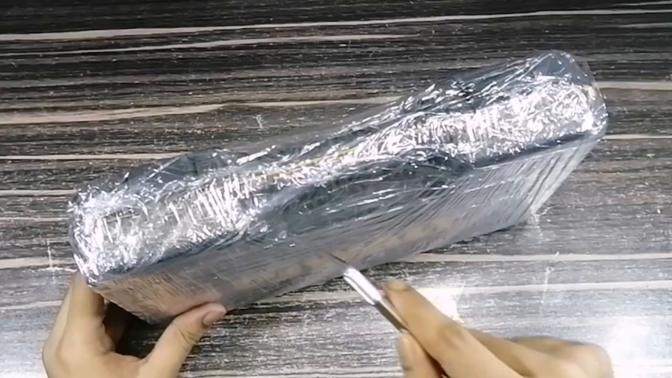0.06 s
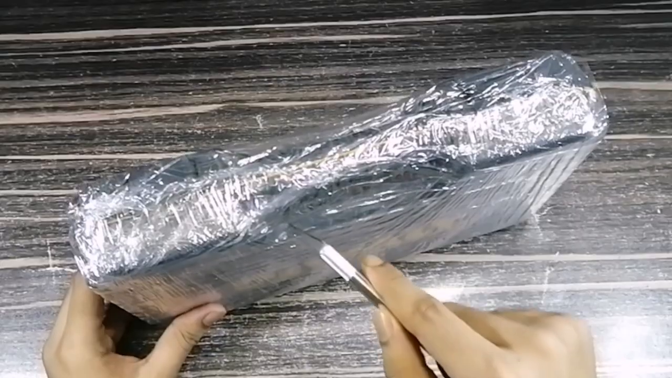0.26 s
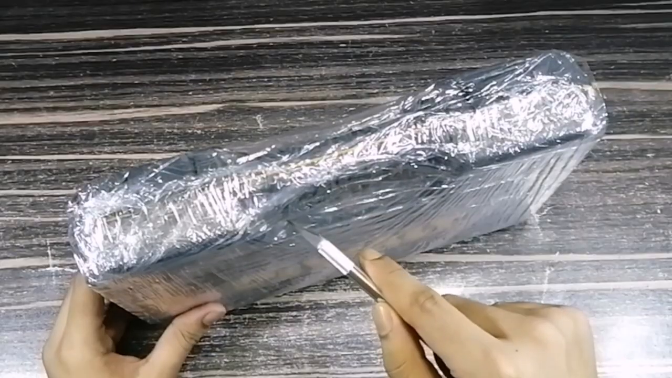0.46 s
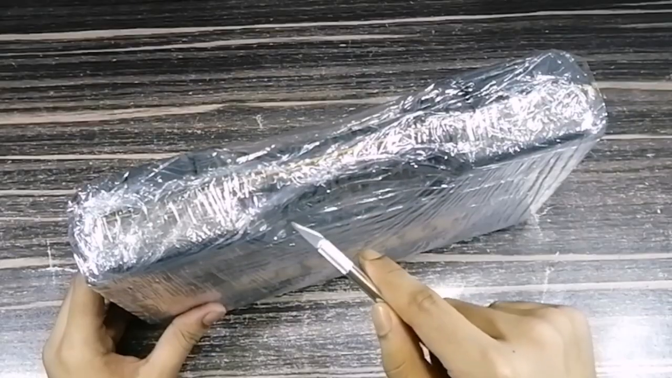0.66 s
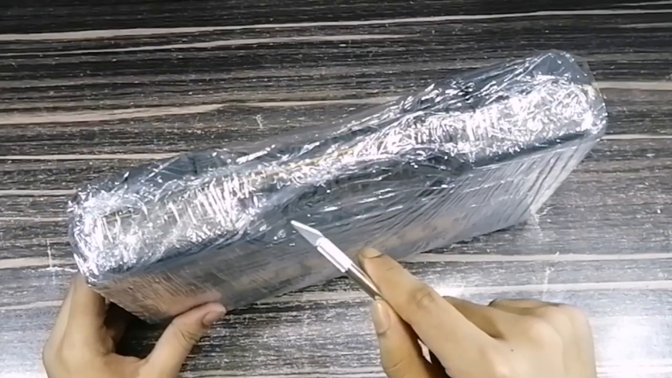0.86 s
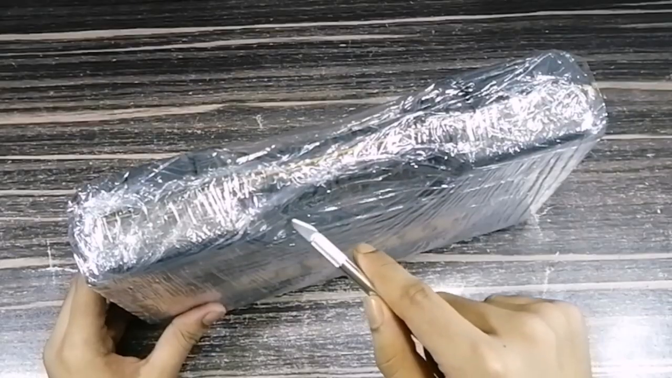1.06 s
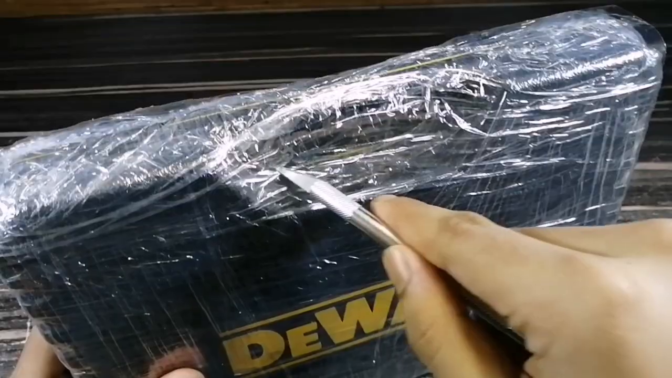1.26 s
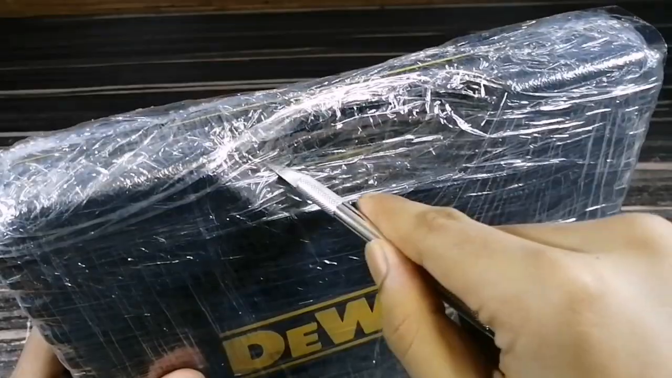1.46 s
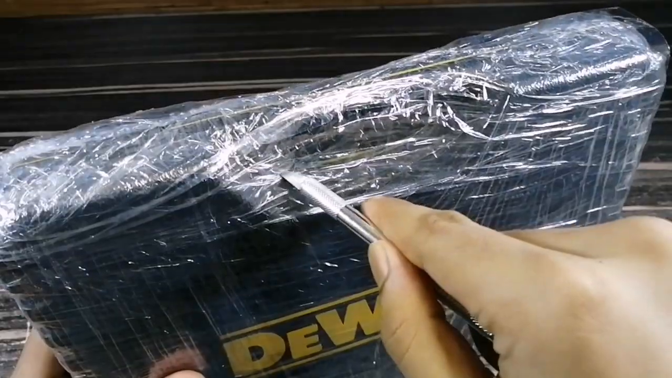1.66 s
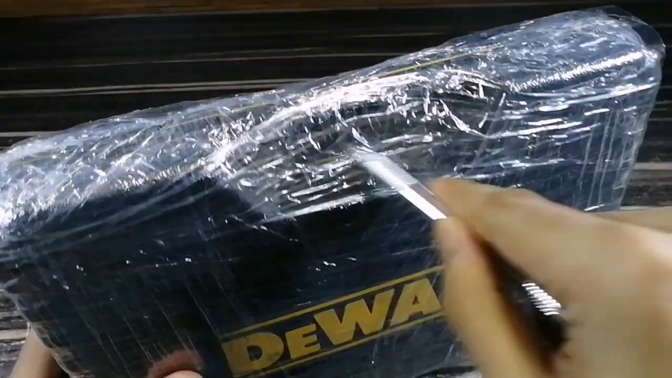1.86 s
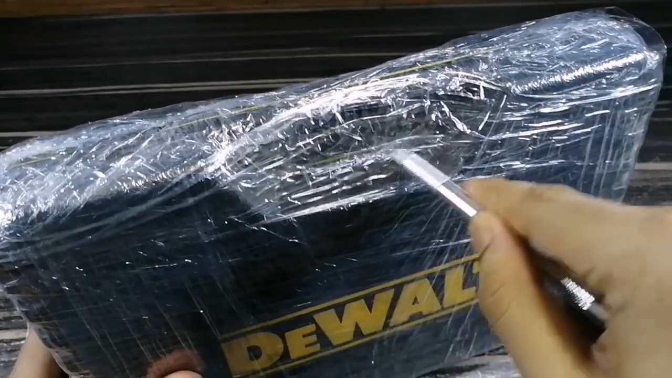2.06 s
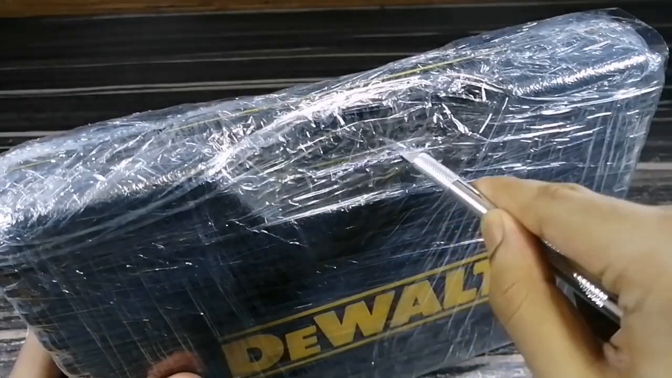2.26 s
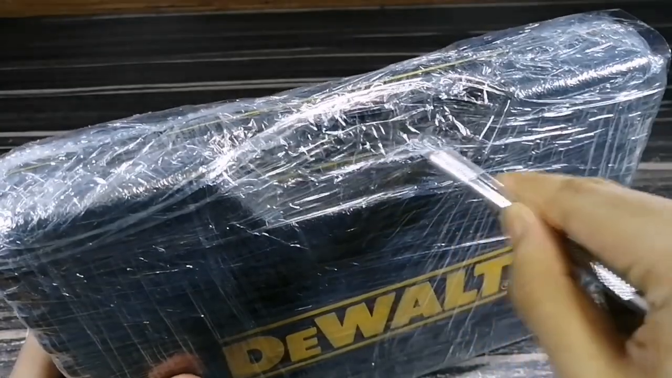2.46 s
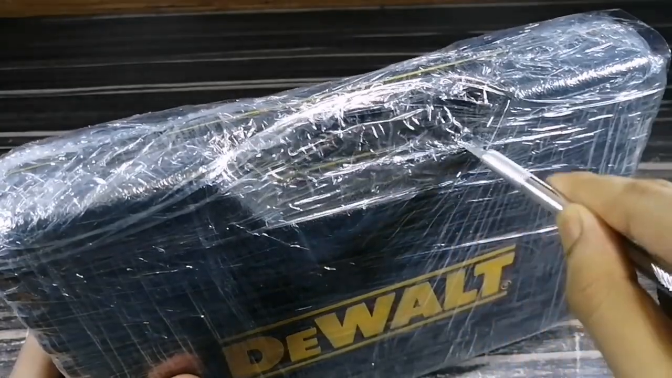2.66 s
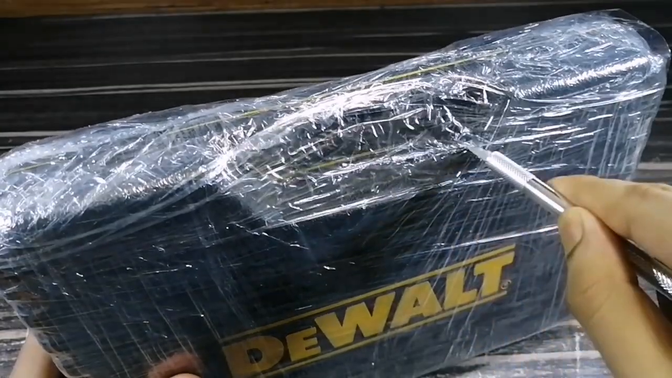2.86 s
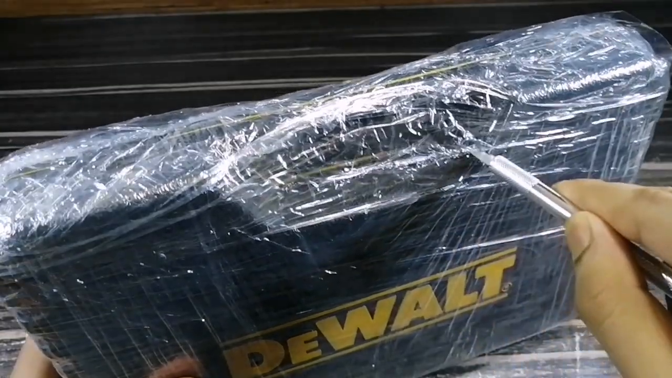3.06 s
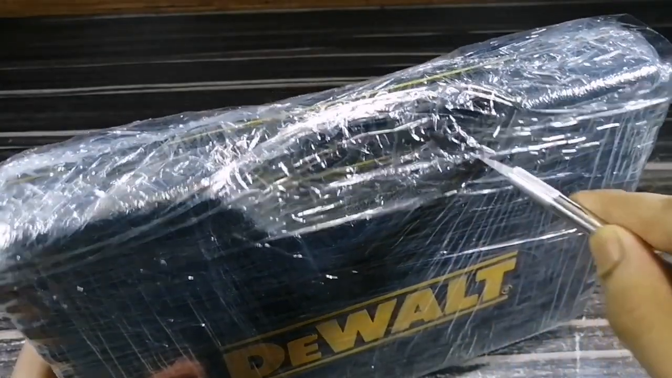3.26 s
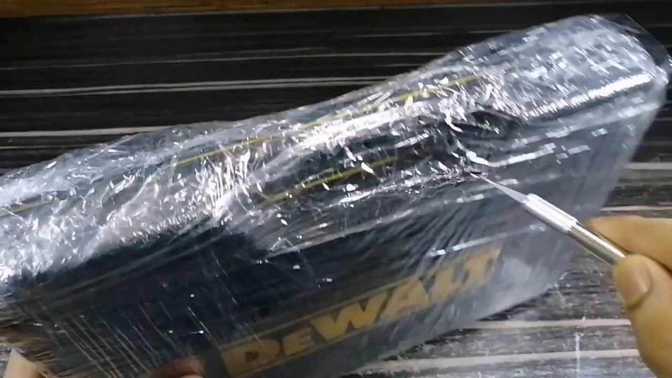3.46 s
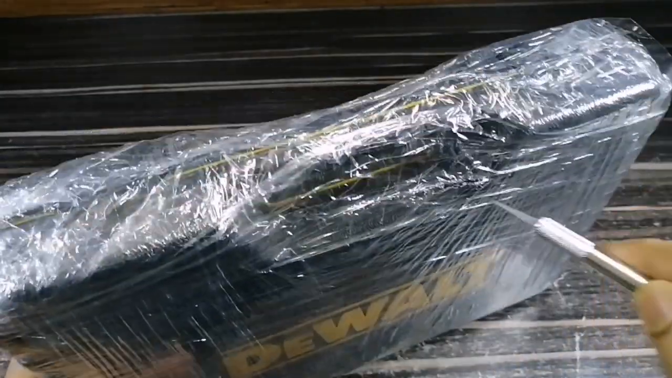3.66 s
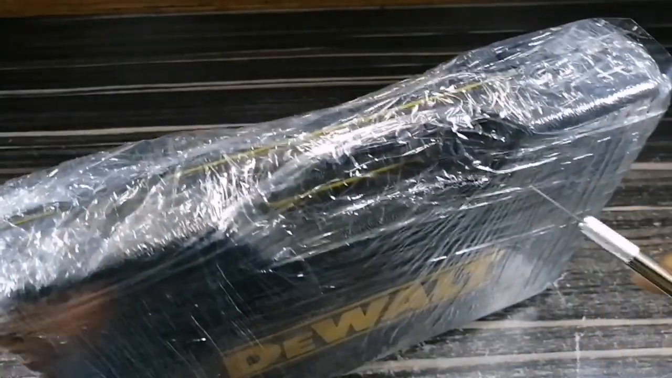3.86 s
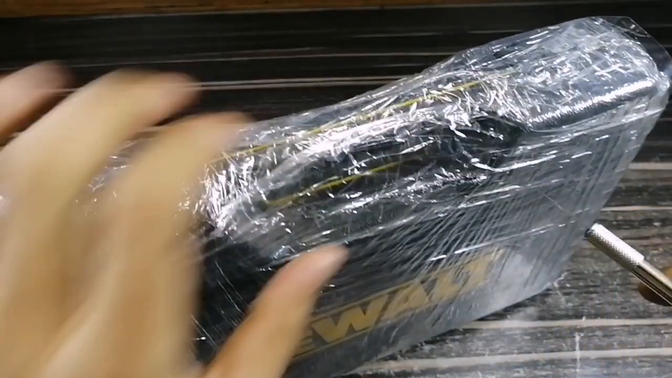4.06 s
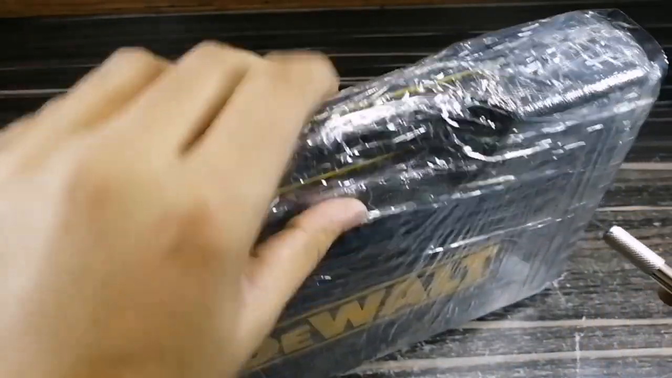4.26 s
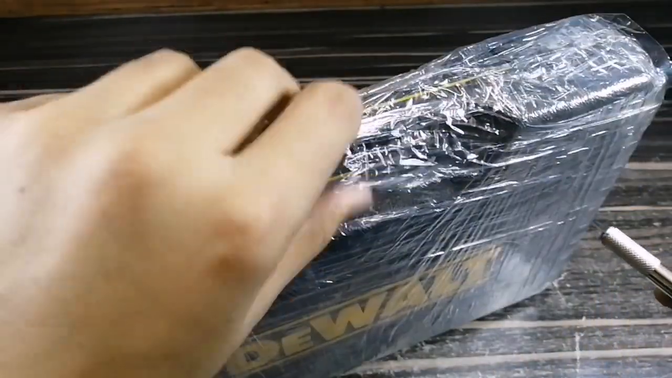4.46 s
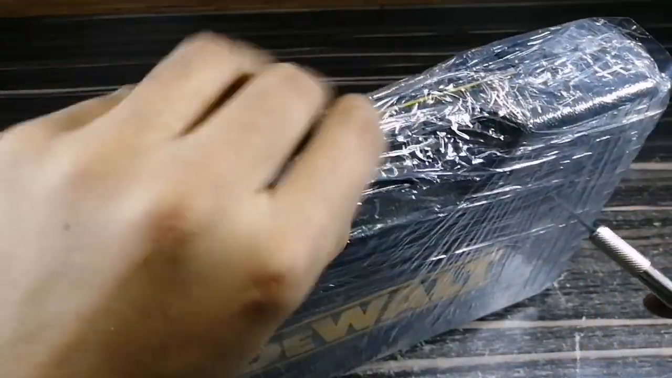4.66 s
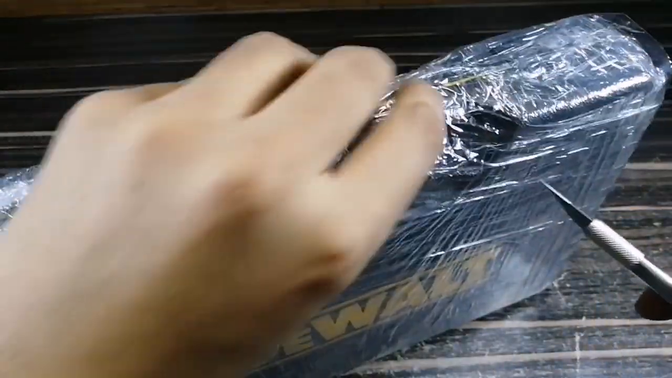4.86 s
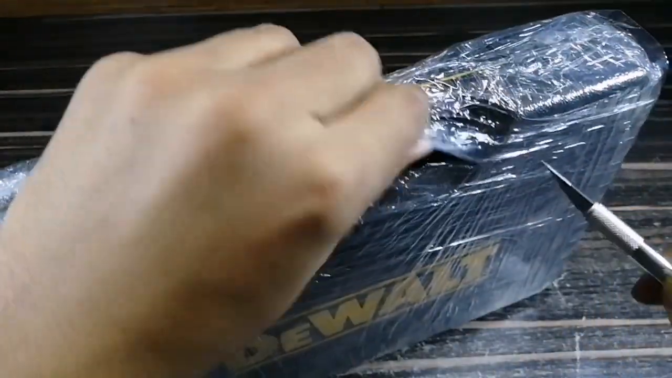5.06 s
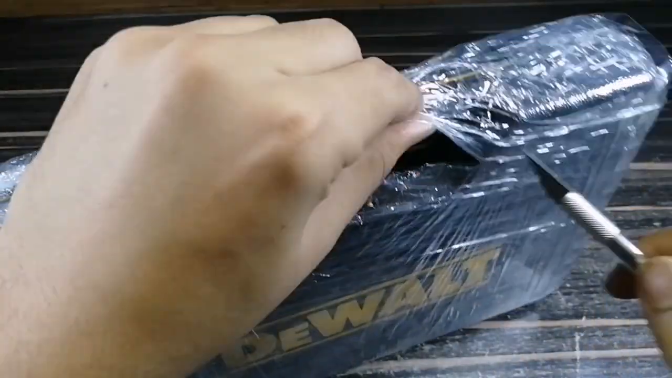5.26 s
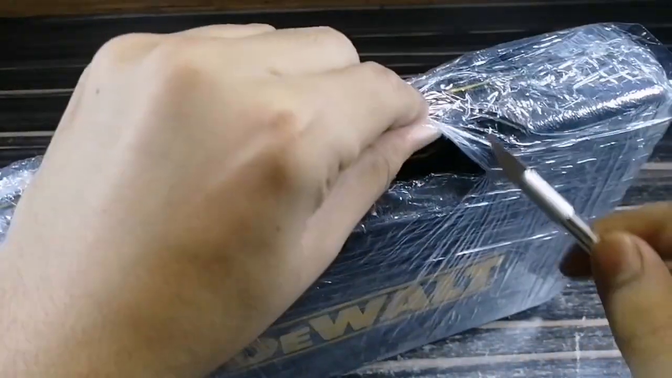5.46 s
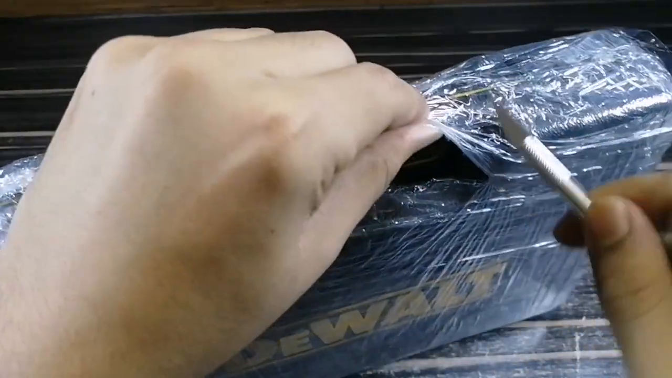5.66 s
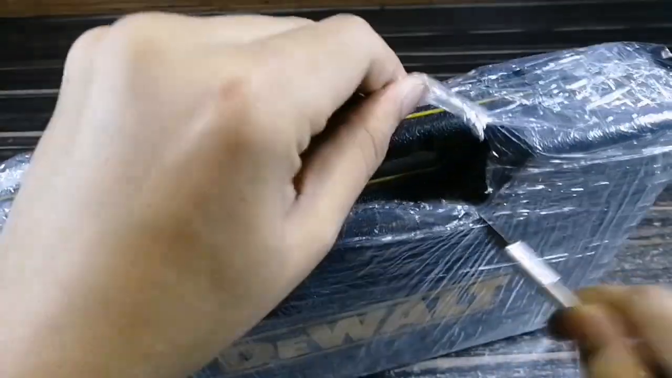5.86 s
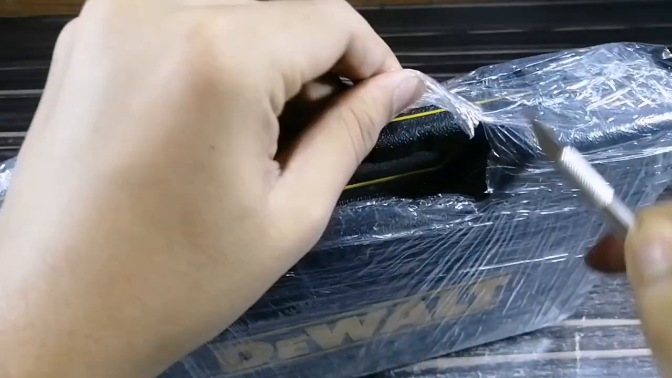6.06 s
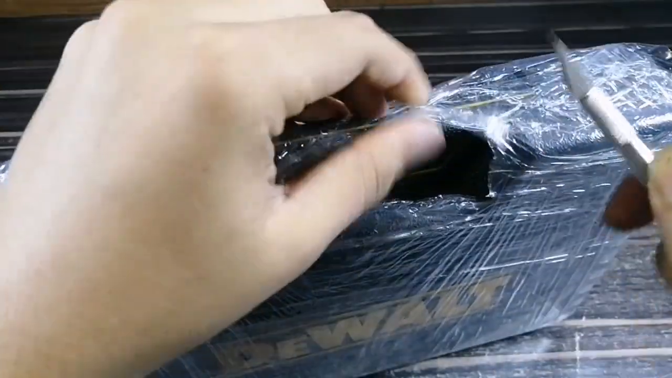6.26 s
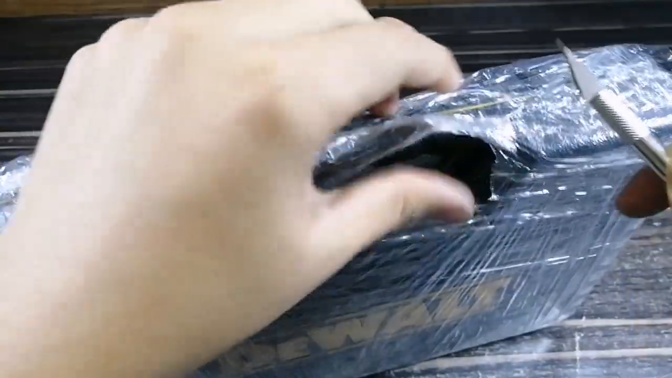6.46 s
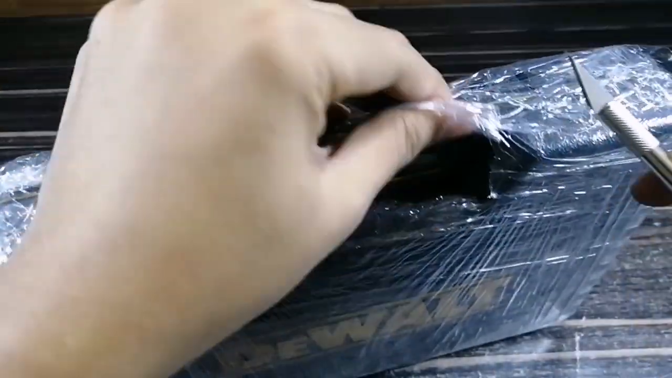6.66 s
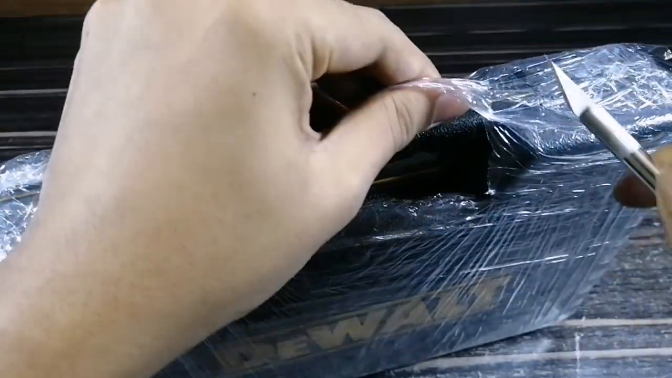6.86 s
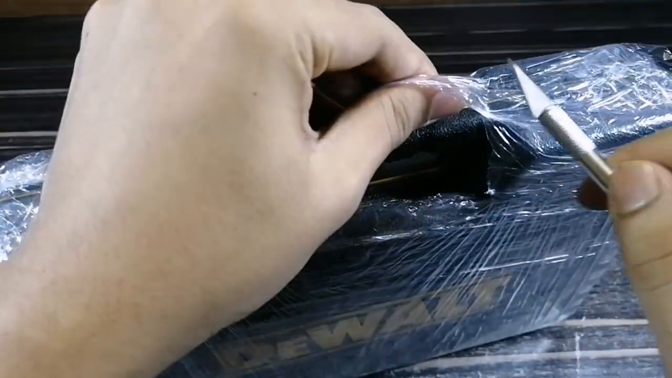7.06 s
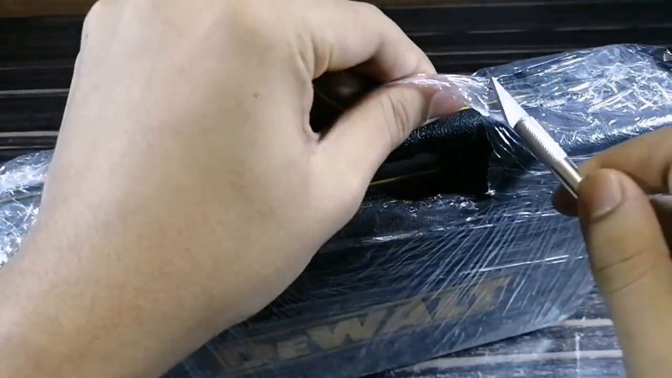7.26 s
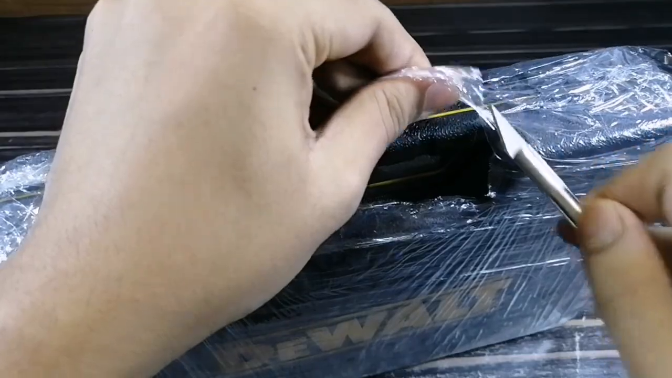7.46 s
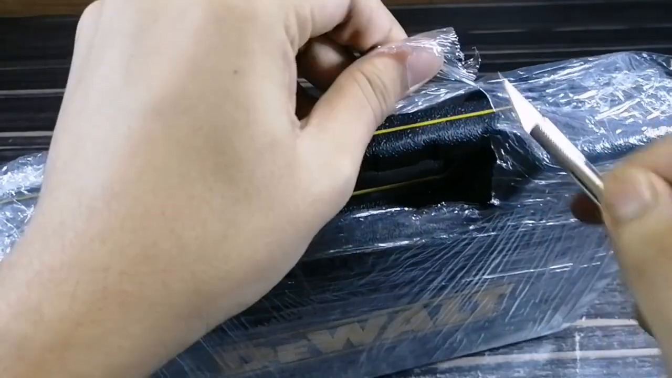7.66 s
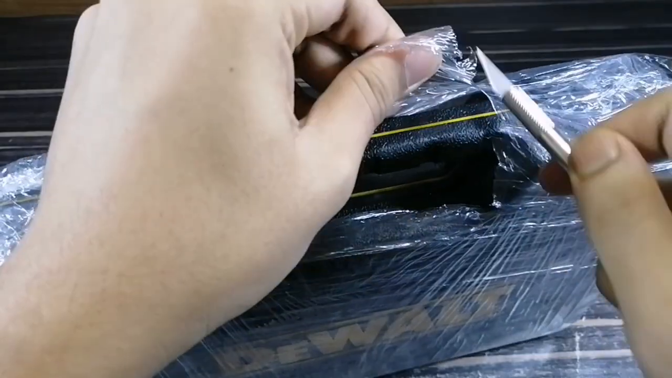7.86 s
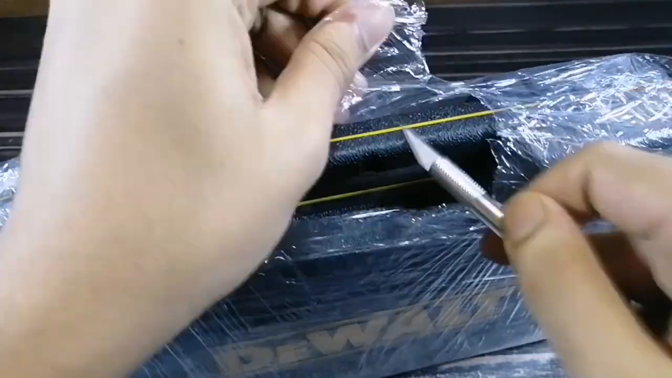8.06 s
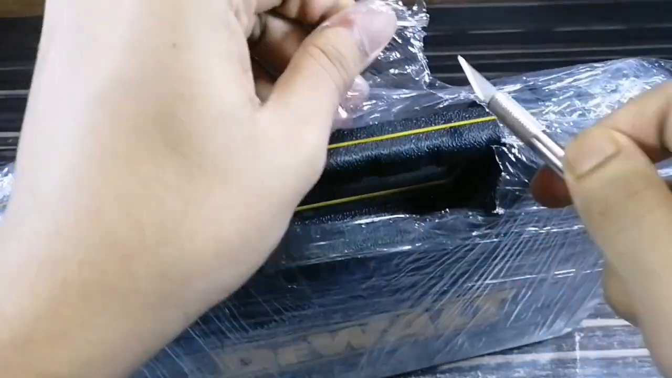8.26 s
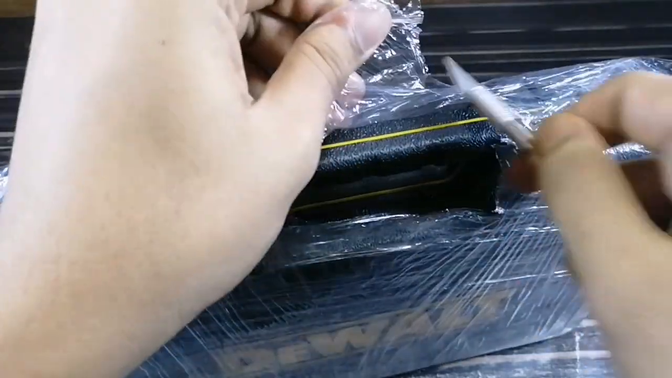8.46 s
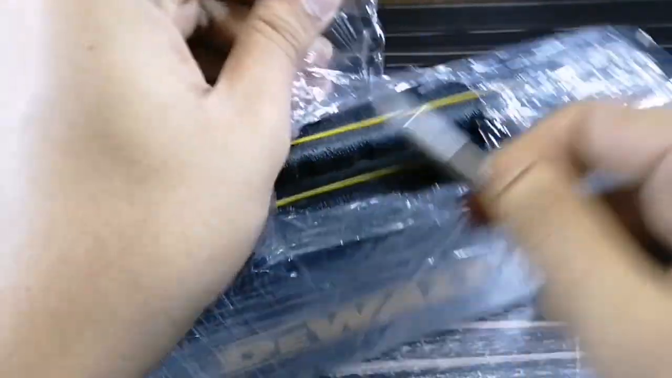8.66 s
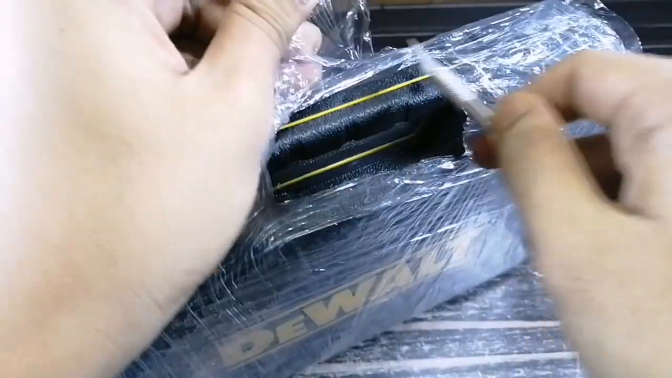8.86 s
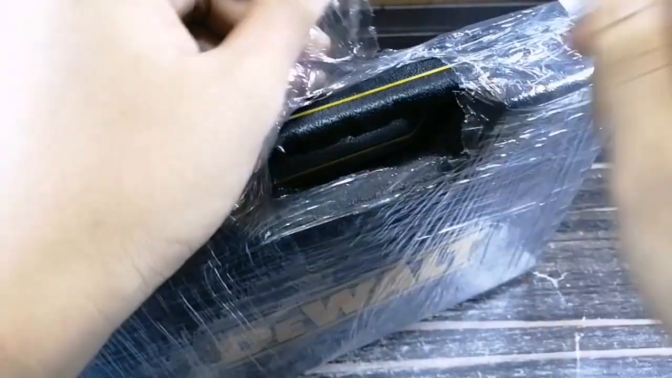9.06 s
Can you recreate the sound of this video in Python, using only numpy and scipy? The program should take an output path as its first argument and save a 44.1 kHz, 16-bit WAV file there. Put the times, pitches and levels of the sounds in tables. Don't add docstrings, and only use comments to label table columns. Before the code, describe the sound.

Very close in a small quiet room, a blade barely touches taut plastic film, then slits it with a flurry of sharp snaps. Fingers rustle and pick at the cut, a flap peels with a loud rip, and it tears off in harsh, overloading bursts. Dull knocks and low table thumps come from the hollow case below.

```python
import sys
import numpy as np
from scipy import signal
from scipy.fft import rfft, irfft, next_fast_len
from scipy.io import wavfile
from scipy.ndimage import uniform_filter1d, map_coordinates

SR = 44100
rng = np.random.default_rng(int(sys.argv[2]) if len(sys.argv) > 2 else 0)


def inscribe(sig):
    pcm = np.round(np.clip(np.atleast_2d(sig).T, -1, 1) * 32767)
    wavfile.write(sys.argv[1], SR, pcm.astype(np.int16))


def attenuation_scalar(level_db):
    decades = np.asarray(level_db, float) / 20
    return 10 ** decades


N = 401751

# (t/s, peak level/dB, case level/dB, t60/s)
CUTS = [(1.0027, -34, -1, .011), (1.0633, -31, -21, .018), (1.448, -34, -25, .008),
        (1.5608, -29, -11, .011), (1.745, -32, 0, .012), (1.7807, -25, 1, .022), (1.8332, -20, -4, .012),
        (1.8505, -6.5, -7.5, .025), (1.9025, -11, -4, .02), (1.9364, -4.5, -6.5, .036),
        (1.9949, -14, -2.5, .018), (2.086, -15, .6, .009), (2.12, -17.5, -3, .025), (2.1533, -20, -28, .01),
        (2.1928, -18.5, -22, .008), (2.3373, -28, -22, .011), (2.3482, -26, -23, .008),
        (2.3886, -8, -4.5, .03), (2.45, -13, -23, .01), (2.5012, -27, -14, .012), (2.567, -6, 2.5, .022),
        (2.6112, -15.5, -3, .027), (2.6258, -16, 1, .015), (2.654, -22.5, 2.5, .069),
        (2.6674, -6, -12.5, .009), (2.6754, -14.5, -4, .011), (2.6897, -19.5, -24, .012),
        (2.7353, -22.5, -2.5, .017)]
# (t/s, peak level/dB, case level/dB, t60/s)
PICKS = [(3.564, -10, -8.5, .01), (3.582, -20, -5.5, .02), (3.7697, -8, -30, .02),
         (3.7924, -16.5, -41, .057), (4.0306, -15, -42, .014), (4.5126, -32, -29, .01),
         (4.589, -15, -14, .008), (5.0701, -17, -12, .008), (5.1117, -5, -7, .009), (5.198, -21, -14, .038),
         (5.22, -23, -21, .035), (5.2471, -19.5, -35, .009), (5.384, -16.5, -40, .018),
         (5.4084, -9, -36, .008), (5.4772, -21, -.6, .008)]
# (t/s, peak level/dB, case level/dB, t60/s)
PEELS = [(5.8395, -13, -30, .013), (5.851, -2.5, -13.5, .058), (5.89, -3, -36, .01),
         (6.0795, -23.5, .4, .026), (6.162, -24, -28, .006), (6.2937, -21, -15, .016),
         (6.3479, -17, -16, .018), (6.4069, -17, -10.5, .025), (6.7446, -25, -30, .025),
         (6.777, -25, -32, .005), (6.8756, -22, -39, .008), (7.0098, -19, -33, .02),
         (7.0183, -16, -31, .007), (7.2102, -19.5, -33, .01), (7.3705, -31.5, -18, .013),
         (7.4082, -24, -25, .005), (7.497, -14, -38, .007), (7.5253, -21, -34, .015)]
# (t/s, peak level/dB, case level/dB, t60/s)
TEARS = [(7.5731, 2.5, -22, .044), (7.5972, -12, -15, .021), (7.8687, -11, -21, .013),
         (7.9532, -26.5, -11.5, .03), (7.9939, -12, -42, .012), (8.0189, -4, -22, .017),
         (8.0735, 9, -11, .028), (8.0855, -9, -3, .026), (8.1194, -8, -7, .026), (8.2194, -6, -6, .045),
         (8.2382, -9, -8.5, .031), (8.5555, -21, -34, .023), (8.5755, -10.5, -3, .031),
         (8.6285, -21, 6, .02), (8.653, -10.5, -21, .01), (8.6577, -6.5, -5.5, .011),
         (8.663, -10.5, -4, .018), (8.6864, -11.5, -4.5, .037), (8.9038, -19, -28, .006),
         (8.9754, -26.5, -15, .006), (9.003, -27, -25, .006), (9.0619, -27, -12.5, .008),
         (9.0988, -24, -27, .013)]
# (t/s, peak level/dB, case level/dB, t60/s)
DABS = [(4.6698, -25, -5, .014), (4.738, -25, 3.5, .028), (4.8062, -25.5, 5.5, .007),
        (5.6162, -26, -25, .012), (5.8017, -17.5, -40, .011), (6.4172, -24.5, 3, .015),
        (6.6869, -24, -30, .006), (6.8635, -26, -37, .005), (7.298, -29.5, -21, .012),
        (7.879, -18, -28, .011), (8.3561, -16, -25, .006), (8.3187, -17.5, -10.5, .013),
        (8.4412, -21, -17.5, .016), (8.7332, -19.5, 2.5, .016)]
CUT_SIZZLE_DB, PICK_SIZZLE_DB, PEEL_SIZZLE_DB, TEAR_SIZZLE_DB, DAB_SIZZLE_DB = -1.2, -3.5, -4, -3.5, -22
DULLS_ABOVE_DB, DULLING = -6, 1.5
# (t/s, peak level/dB, case level/dB, run/s, t60/s)
RIPS = [
    (1.8325, -6.5, -10.5, 0.018, 0.05),
    (3.736, -21, -15, 0.09, 0.11),
    (4.0127, -9, -40, 0.017, 0.062),
    (4.542, -14, -7, 0.039, 0.084),
    (5.8473, 4, -18, 0.021, 0.25),
    (7.5712, -1, -20.5, 0.022, 0.26),
    (8.0725, 9, -12, 0.031, 0.27),
    (8.5745, 1.5, -19.5, 0.058, 0.17),
]
# (t/s, level/dB, rise/s for 20 dB, hold/s, fall/s for 20 dB)
BLADE_MOVES = [
    (.342, -46, .04, 0, .1),
    (1.003, -49.5, .01, .12, .3),
    (1.26, -46, .3, .19, .15),
    (1.785, -34, .1, 0, .45),
    (2.092, -28, .03, 0, .14),
    (2.389, -27, .008, .01, .1),
    (2.567, -32.5, .012, .13, .18),
    (2.92, -46, .1, 0, .05),
    (3.239, -51, .2, 0, .3),
]
# (t/s, level/dB, rise/s for 20 dB, hold/s, fall/s for 20 dB)
HAND_MOVES = [(3.551, -41, .3, .06, .3), (3.756, -32.5, .17, 0, .28), (4.01, -30, .02, 0, .17),
              (4.185, -37, .04, .09, .48), (4.597, -36, .17, 0, .15), (4.733, -37, .25, .3, .1),
              (5.083, -26, .06, 0, .1), (5.132, -37, .1, .1, .5), (5.401, -38, .2, 0, .3),
              (5.835, -31, .08, .05, .37), (6.228, -33, .07, .19, .17), (6.65, -33, .33, 0, .17),
              (6.71, -40.5, .1, .18, .1), (7.027, -43, .025, 0, .26), (7.3, -52.5, .3, .15, .1),
              (7.57, -30.5, .14, .03, .24), (7.874, -36, .01, 0, .09), (8.05, -37.5, .1, .32, .18),
              (8.56, -33, .06, .17, .55), (9.109, -28, .1, 0, .1)]
STILL_DB, HELD_DB, TOUCH_S = -65, -59, 1.0
# (t/s, case level/dB)
PRESS = [(0.0, -2.5), (1.4, -3.5), (2.95, -9.5), (3.43, -13), (5.69, -10.5), (6.1, -16), (7.86, -16.5),
         (8.06, -6), (8.4, -11), (8.66, -5), (9.11, -18)]
# (f/Hz, level/dB per Hz)
FILM = [(1180, -31), (2000, -28.5), (2700, -9.5), (3500, -8), (5150, -4.5), (5560, -3), (7200, 2),
        (8700, -1), (14000, 8), (15600, 8.5)]
SPLIT_HZ = 8430
# (f/Hz, width/Hz, level/dB)
SHELL = [(310, 610, -5.5), (645, 290, -1), (1165, 335, -1), (1930, 680, 2.5), (2690, 1450, -3)]
# (t/s, peak level/dB, f/Hz, t60/s)
KNOCKS = [(1.774, -30, 183, 0.055), (1.848, -25, 175, 0.069), (1.937, -22.5, 274, 0.053),
          (2.083, -26, 272, 0.063), (2.386, -24, 257, 0.057), (2.567, -18, 188, 0.069),
          (3.581, -21.5, 152, 0.021), (3.733, -25, 192, 0.079), (3.937, -28, 202, 0.12),
          (4.261, -26, 165, 0.068), (4.736, -25, 470, 0.025), (4.805, -23.5, 167, 0.026),
          (5.106, -34, 507, 0.054), (5.853, -24, 193, 0.096), (6.417, -29, 272, 0.073),
          (7.574, -26, 214, 0.067), (8.069, -33, 285, 0.038), (8.221, -16, 502, 0.044),
          (8.687, -12, 282, 0.052), (8.731, -15.5, 291, 0.041), (8.833, -30.5, 206, 0.13)]
# (t/s, hum level/dB, t60/s)
ROCK = [(1.6, -49, 0.85), (1.84, -41, 0.14), (1.93, -41.5, 0.18), (2.57, -36, 0.21), (2.66, -36, 0.17),
        (3.46, -32.5, 0.12), (3.565, -28, 0.12), (3.709, -26, 0.092), (3.734, -28, 0.62),
        (3.935, -33, 0.27), (3.981, -28, 0.16), (4.04, -43, 0.53), (4.195, -29, 0.15), (4.249, -37, .3),
        (4.28, -31.5, 0.19), (4.78, -27, 0.15), (4.805, -33.5, 0.25), (5.854, -26.5, 0.2),
        (6.549, -32, 0.3), (7.586, -34, 0.19), (8.085, -25, 0.16), (8.13, -22, 0.11), (8.18, -27.5, 0.39),
        (8.345, -36, 0.14), (8.68, -36, 0.34)]
# (f/Hz, level/dB)
TABLE = [(108, 4), (195, -16.5)]
# (t/s, level/dB)
BUMPS = [(0.0, -78), (0.17, -61), (3.27, -60), (3.43, -32), (4.87, -53), (7.48, -53), (7.56, -38.5),
         (9.11, -66)]
# (t/s, left-right level/dB)
PLACE = [(0.0, -1.5), (3.63, 0), (4.08, 1.5), (4.49, -1.5), (6.85, -0.5), (9.11, 0)]
# (f/Hz, likeness 0-1)
NEAR_ALIKE = [(100, .98), (500, 0.96), (1500, 0.88), (3000, 0.2), (12000, .35)]
# (f/Hz, lead/rad)
LEAD = [(300, 0.12), (2000, 0.95), (4000, 2.2), (7000, 1.8), (15000, 1.5)]
# (f/Hz, t60/s)
ROOM = [(200, 0.32), (1500, 0.2), (5000, 0.17), (14000, 0.19)]
# (f/Hz, level/dB per Hz)
FLOOR = [(15, -52), (25, -65), (49, -4), (82, -23), (119, -10.5), (247, -14), (275, -24), (360, -12),
         (390, -15.5), (686, -21), (744, -19), (1380, -25), (15600, -35)]
# (f/Hz, likeness 0-1)
FLOOR_ALIKE = [(40, 0.57), (100, 1), (400, 0.72), (1500, 0.17), (4000, 0.079)]
# (f/Hz, width/Hz, level/dB)
MACHINES = [(745, 17, -6), (310, 58, -3), (114, 23, 1)]


def film():
    hiss, sizzle, case = np.zeros((3, N))
    snaps(hiss, sizzle, case)
    rips(hiss, sizzle, case)

    case_db, = curves(PRESS)
    pops = creases(rate=450, spread_db=6, t60=.007)
    crinkle = attenuation_scalar(handling() - 5) * (pops + .8)
    hiss += crinkle
    sizzle += attenuation_scalar(-3.5) * crinkle
    case += attenuation_scalar(case_db) * crinkle

    low = lambda hz: 1 / (1 + (hz / SPLIT_HZ) ** 8)
    hiss_colour = lambda hz: attenuation_scalar(along(FILM, hz)) * low(hz)
    sizzle_colour = lambda hz: attenuation_scalar(along(FILM, hz)) * (1 - low(hz))
    case_colour = lambda hz: resonant(SHELL)(hz) * (1j * hz / (140 + 1j * hz)) ** 2
    folds = patchy(depth_db=3.5)
    sheet = shaped(hiss, hiss_colour, folds) + shaped(sizzle, sizzle_colour, folds)
    return sheet + shaped(case, case_colour, folds[:, ::-1])


def snaps(hiss, sizzle, case):
    kinds = [(CUTS, CUT_SIZZLE_DB), (PICKS, PICK_SIZZLE_DB), (PEELS, PEEL_SIZZLE_DB),
             (TEARS, TEAR_SIZZLE_DB), (DABS, DAB_SIZZLE_DB)]
    t = np.arange(SR // 8) / SR
    attack = (1 - np.exp(-t / .0003)) * (.7 + 1.2 * np.exp(-t / .001))
    settling = 0.056 * attenuation_scalar(-60 * t / 0.15)
    for rows, bright_db in kinds:
        for s, db, case_db, t60 in rows:
            crack = attenuation_scalar(-60 * t / max(t60, .003))
            shape = attenuation_scalar(db) * (crack + settling) * attack
            sizzle_db = bright_db - DULLING * max(db - DULLS_ABOVE_DB, 0)
            add(hiss, s, shape)
            add(sizzle, s, attenuation_scalar(sizzle_db) * shape)
            add(case, s, attenuation_scalar(case_db) * shape)


def rips(hiss, sizzle, case):
    front = creases(rate=2000, spread_db=3, t60=.008) + .7
    t = np.arange(SR // 3) / SR
    for s, db, case_db, run, t60 in RIPS:
        fade_db = -60 * np.maximum(t - run, 0) / t60
        shape = attenuation_scalar(db - 20 + fade_db) * front[round(s * SR):][:len(t)]
        add(hiss, s, shape)
        add(sizzle, s, attenuation_scalar(-4.5) * shape)
        add(case, s, attenuation_scalar(case_db + 4) * shape)


def handling():
    t = np.arange(0, N / SR, .002)
    levels = [np.where(t < TOUCH_S, STILL_DB, HELD_DB)]
    for s, db, rise, hold, fall in BLADE_MOVES + HAND_MOVES:
        away = np.maximum((s - t) / rise, (t - s - hold) / fall)
        levels.append(db - 20 * np.maximum(away, 0))
    return np.interp(np.arange(N) / SR, t, np.max(levels, axis=0))


def creases(rate, spread_db, t60):
    pops = rng.random(N) < rate * attenuation_scalar(5 * wobble(25)) / SR
    sizes = pops * attenuation_scalar(spread_db * np.minimum(rng.exponential(size=N), 3))
    return unit(signal.lfilter([1], [1, -attenuation_scalar(-60 / (t60 * SR))], sizes))


def patchy(depth_db):
    z = signal.stft(rng.standard_normal((2, N)), nperseg=64)[2]
    field = uniform_filter1d(rng.standard_normal(z.shape[1:]), size=3, axis=0)
    field = uniform_filter1d(field, size=9, axis=1)
    x = signal.istft(z * attenuation_scalar(depth_db * unit(field)), nperseg=64)[1][:, :N]
    power = np.abs(uniform_filter1d(x ** 2, size=40))
    return unit(x / np.sqrt(power + 0.054))


def knocks():
    out, t = np.zeros(N), np.arange(SR // 4) / SR
    for s, db, hz, t60 in KNOCKS:
        add(out, s, attenuation_scalar(db - 60 * t / t60) * np.sin(2 * np.pi * hz * t))
    return filtered(out, lambda hz: 1j * hz / (90 + 1j * hz))


def table():
    swing, t = np.zeros(N), np.arange(SR // 2) / SR
    for s, db, t60 in ROCK:
        add(swing, s, attenuation_scalar(db + 2 - 60 * t / t60) * (1 - np.exp(-t / 0.011)))
    clock = 2 * np.pi * np.arange(N) / SR
    hum = np.zeros(N)
    for hz, db in TABLE:
        level = attenuation_scalar(db + 2.5 * wobble(30))
        hum += level * np.sin(hz * clock + 1.3 * wobble(25))
    rumble_db, = curves(BUMPS)
    low = lambda hz: resonant([(42, 40, 0)])(hz) ** 2
    rumble = shaped(0.57, low, rng.standard_normal((2, N)))
    return swing * hum + attenuation_scalar(rumble_db - 6) * rumble


def room(x):
    out, hop = np.zeros((2, N + SR)), SR // 5
    noise = rng.standard_normal((N // hop + 1, 2, SR // 4))
    hz, t, z = signal.stft(noise, SR, nperseg=256)
    decay = attenuation_scalar(-60 * t / along(ROOM, hz)[:, None])
    tails = signal.istft(z * decay, SR, nperseg=256)[1]
    for start, tail in zip(range(0, N, hop), tails):
        tail = tail / np.linalg.norm(tail[0])
        wet = signal.fftconvolve(x[None, start:start + hop], tail, axes=1)
        out[:, start + 220:][:, :wet.shape[1]] += wet
    return out[:, :N]


def floor():
    colour = lambda hz: attenuation_scalar(along(FLOOR, hz)) + attenuation_scalar(-8.5) * np.abs(resonant(MACHINES)(hz))
    tone = shaped(attenuation_scalar(.7 * wobble(4)), colour, rng.standard_normal((2, N)))
    return attenuation_scalar(-49) * ports(tone, FLOOR_ALIKE, [(1, 0)])


def ports(pair, alike, lead):
    turn = lambda hz: np.arccos(np.clip(along(alike, hz), -1, 1)) / 2
    mid, side = filtered(pair, lambda hz: np.array([np.cos(turn(hz)), np.sin(turn(hz))]))
    left_right = np.array([mid + side, mid - side])
    return filtered(left_right, lambda hz: np.exp(.5j * along(lead, hz) * [[1], [-1]]))


def shaped(envelope, response, source):
    norm = np.sqrt(np.mean(np.abs(response(np.linspace(1, SR / 2, 4096))) ** 2))
    return filtered(envelope * source, response) / norm


def resonant(modes):
    def response(f):
        total = 0
        for k, (c, w, db) in enumerate(modes):
            total = total + (-1) ** k * attenuation_scalar(db) * 1j * f * w / (c * c - f * f + 1j * f * w)
        return total
    return response


def filtered(x, response):
    m = next_fast_len(N + SR // 2)
    return irfft(rfft(x, m) * response(np.fft.rfftfreq(m, 1 / SR)), m)[..., :N]


def wobble(rate):
    knots = rng.standard_normal(int(N * rate / SR) + 4)
    return map_coordinates(knots, [np.arange(N) * rate / SR])


def curves(rows):
    s, *cols = np.transpose(rows)
    return [np.interp(np.arange(N) / SR, s, c) for c in cols]


def along(points, hz):
    f, v = np.transpose(points)
    return np.interp(np.log(hz + 1), np.log(f + 1), v)


def add(track, s, shape):
    piece = track[round(s * SR):][:len(shape)]
    piece += shape[:len(piece)]


def unit(x):
    return x / np.sqrt(np.mean(x ** 2) + 1e-20)


def scene():
    wrap, shell = film(), knocks()
    pan_db, = curves(PLACE)
    pan = attenuation_scalar(np.array([pan_db, -pan_db]) / 2)
    near = ports(wrap, NEAR_ALIKE, LEAD) * pan + shell
    far = attenuation_scalar(-11) * room(wrap[0] + 0.65 * shell)
    return near + far + table() + floor()


def top_cut(x):
    return signal.sosfilt(signal.butter(12, 16240, fs=SR, output="sos"), x)


def record(dry):
    clipped = dry / (1 + np.abs(dry / .93) ** 8) ** (1 / 8)
    limited = filtered(clipped, lambda hz: 1 / (1 + (hz / 15750) ** 120))
    return top_cut(limited)


dry = scene()
out = record(dry)
inscribe(out)
```